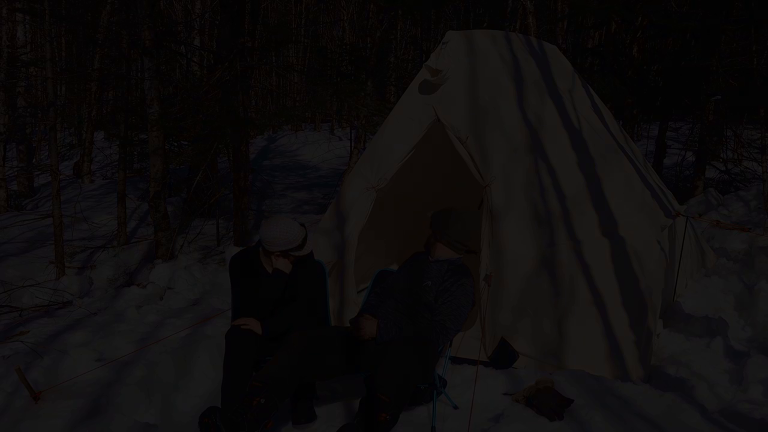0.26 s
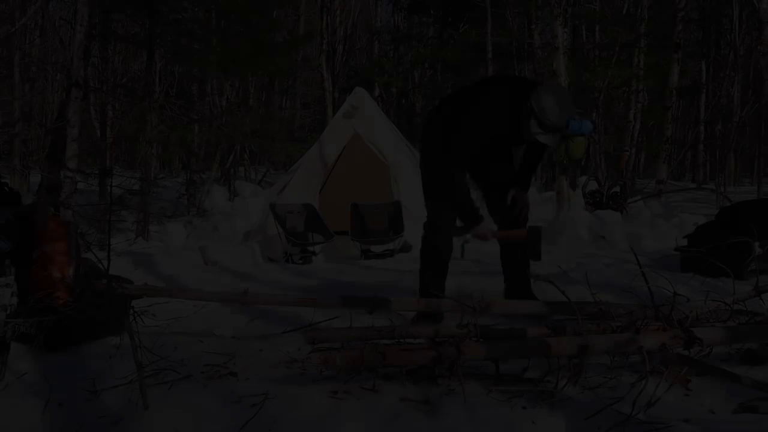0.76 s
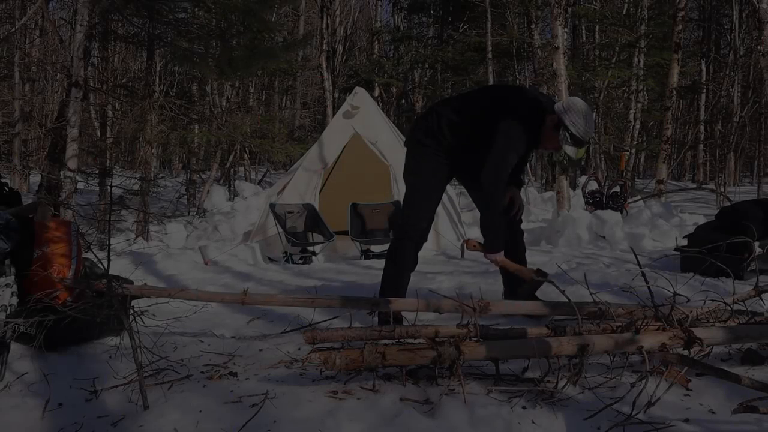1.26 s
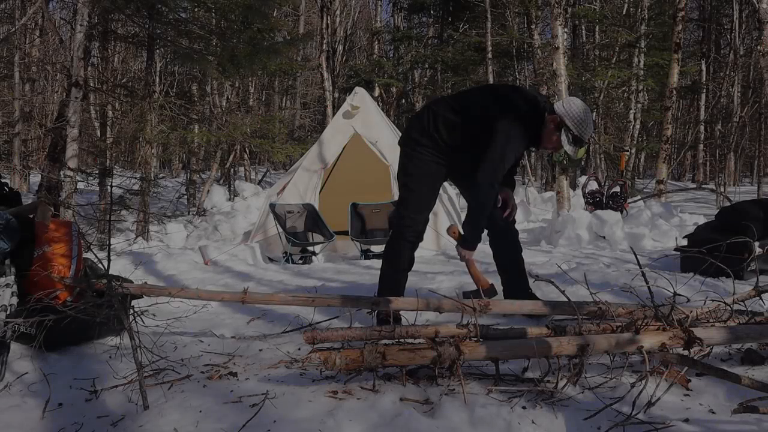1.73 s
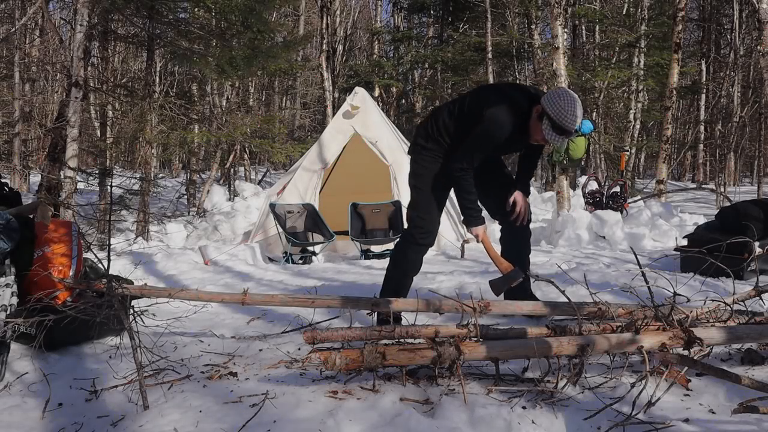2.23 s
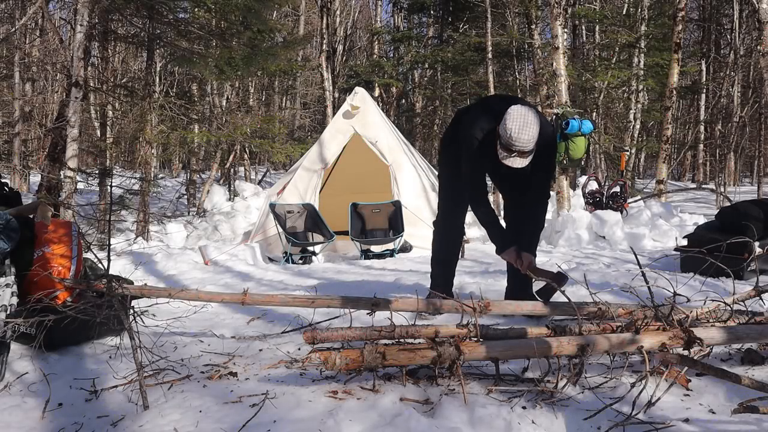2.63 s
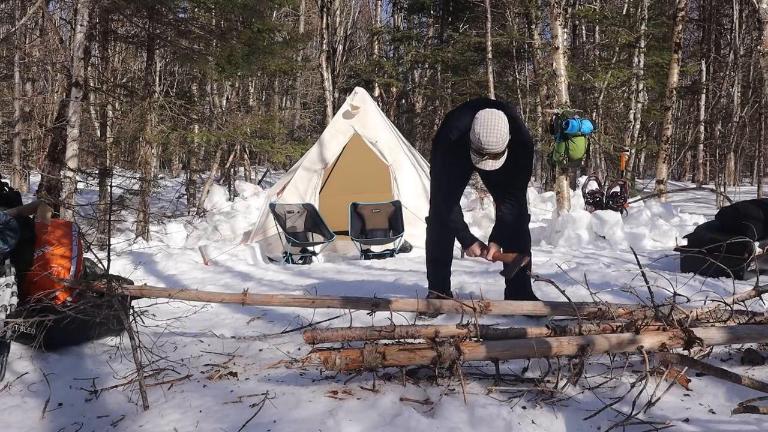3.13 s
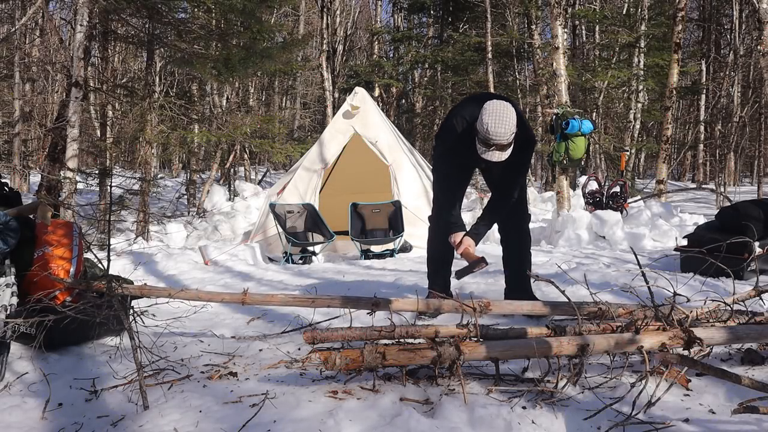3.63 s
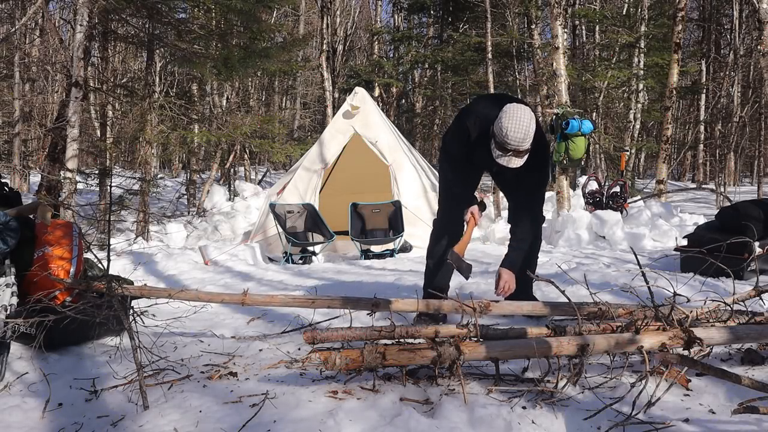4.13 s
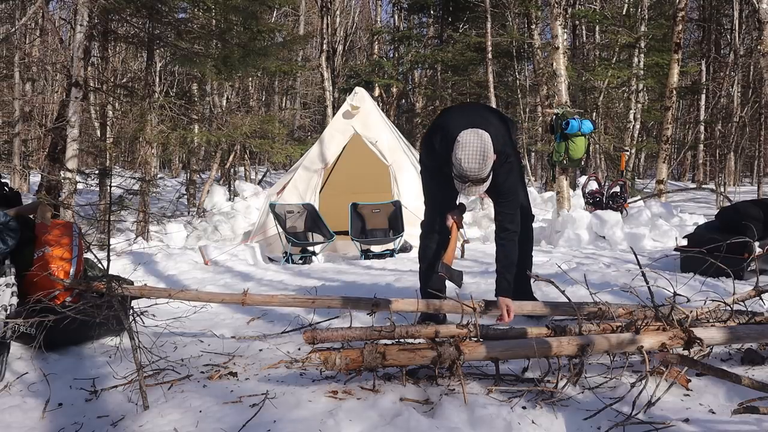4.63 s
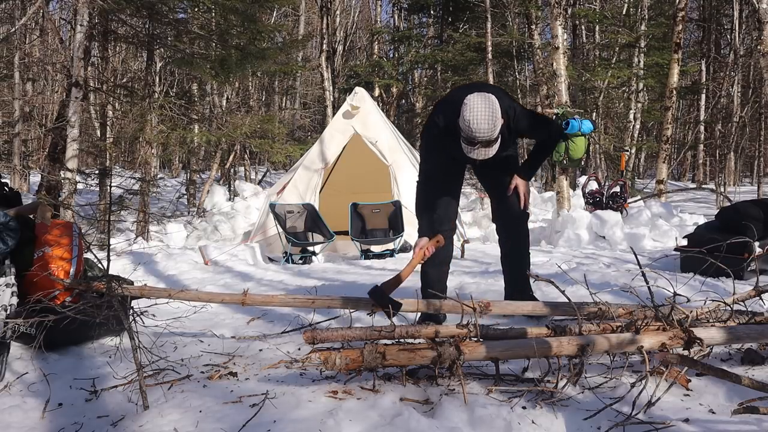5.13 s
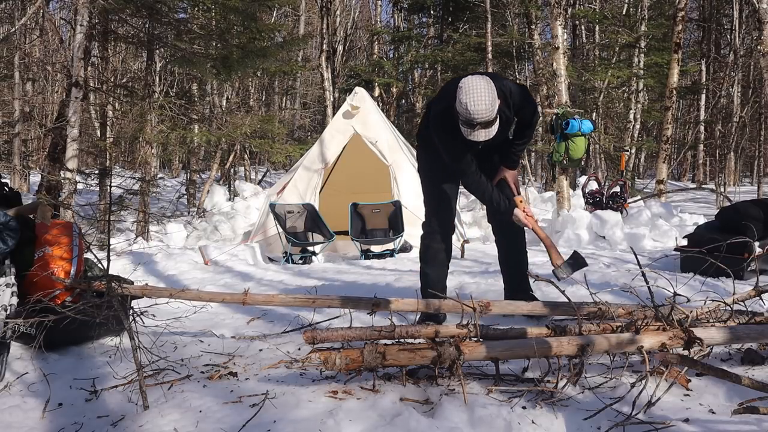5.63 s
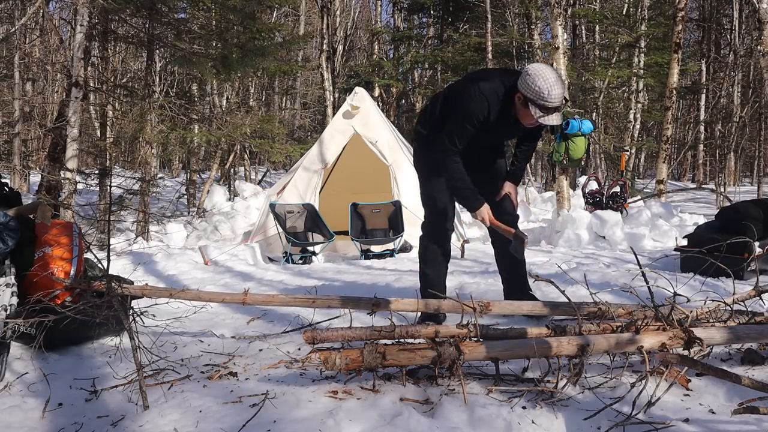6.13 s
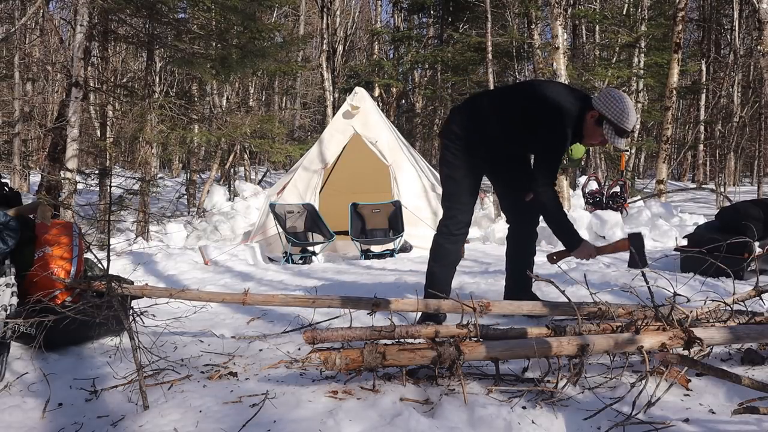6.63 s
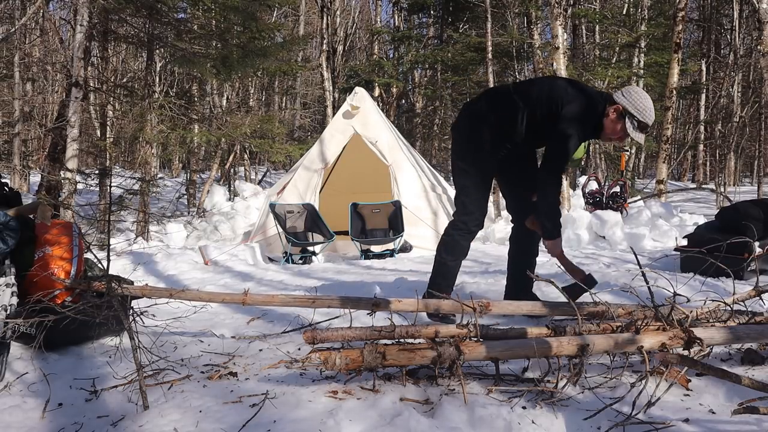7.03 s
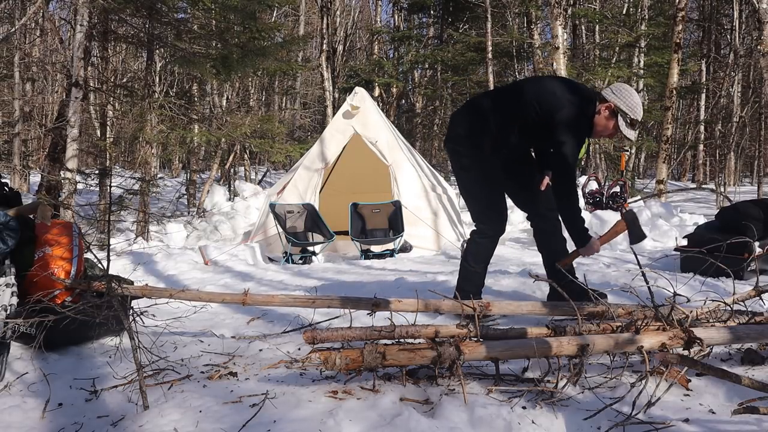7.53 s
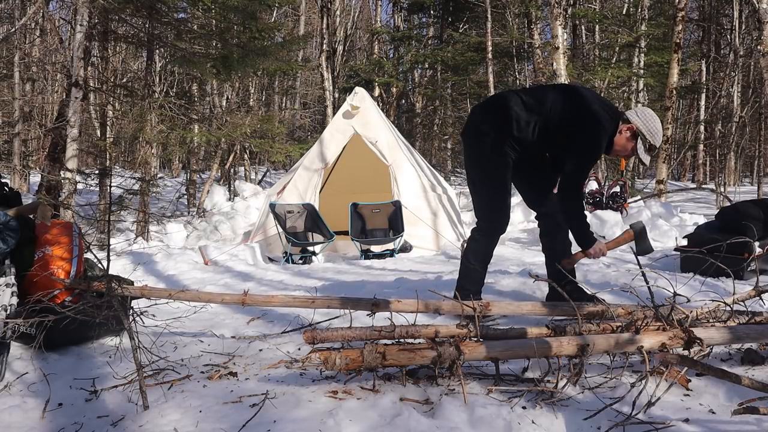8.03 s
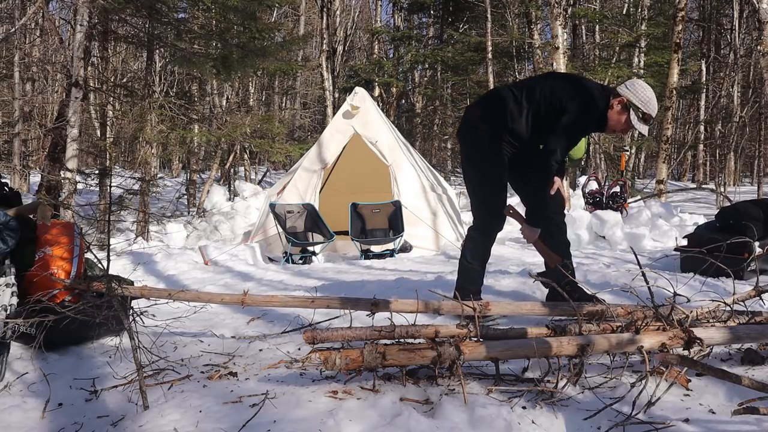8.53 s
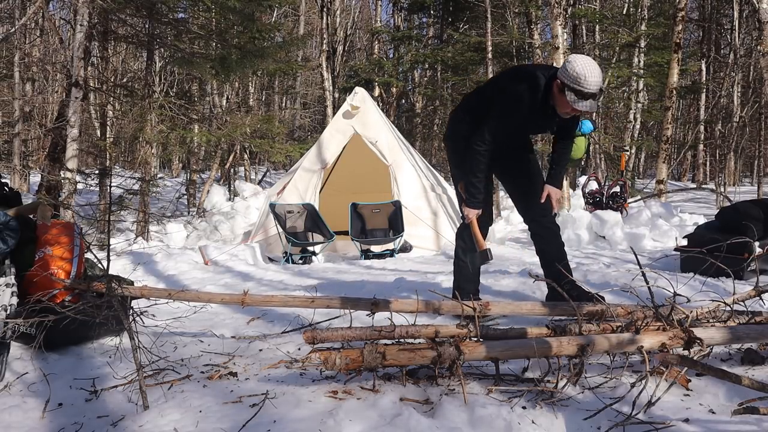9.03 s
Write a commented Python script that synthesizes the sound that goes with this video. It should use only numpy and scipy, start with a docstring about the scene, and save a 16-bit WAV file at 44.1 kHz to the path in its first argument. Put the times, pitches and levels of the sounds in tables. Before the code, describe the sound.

Outdoors in a still, snowy forest, wind briefly buffets the microphone while boots crunch and clothes swish. A hatchet a few metres away hits a dry pole twice, then once more with light bounces. Twigs snap, a duller chop follows, then three stronger blows come about a second apart or less. Each crack and hollow knock scatters back from the trees.

```python
"""A still winter wood: a hatchet chops the limbs off a dead pole lying on snow, a few metres from a microphone.
Each blow is a bright crack of filtered noise and a hollow knock of damped resonances.
The pole rings in decaying sines, splinters crackle as random grains, and trunks scatter the blows back.
Between blows boots crunch in snow and winter clothes swish, both from shaped noise or grains;
at first a light wind rumbles on the microphone."""
import sys
import numpy as np
from scipy import signal
from scipy.fft import rfft, irfft
from scipy.io import wavfile

SR = 44100
rng = np.random.default_rng(int(sys.argv[2]) if len(sys.argv) > 2 else 0)


def wav_out(sig):
    """Save sig, one row per channel (or a flat mono array), as 16-bit PCM at SR to the path in sys.argv[1]."""
    wavfile.write(sys.argv[1], SR, np.round(np.clip(np.atleast_2d(sig).T, -1, 1) * 32767).astype(np.int16))


N = 408366
T = np.arange(N) / SR
SHORT = T[:SR // 2]

# full chops into the pole: t/s, crack/dB, crack treble/dB, knock/dB, knock pitch/Hz, clack/dB,
# clack pitch/Hz, pole ring/dB, thump/dB (before the gain in thump()), splinters/dB
CHOP_EVENTS = [(1.1558, -8.5, 2.5, -12, 810, -32, 1320, -22.5, -24.5, -30.5),
               (1.64, -8.5, -3.5, -7, 946, -18.5, 2170, -23.5, -26.5, -27.5),
               (3.3743, -5, 3, -12, 630, -21, 2080, -14.5, -31.5, -28),
               (5.3886, -10, -5, -16.5, 470, -26.5, 1940, -42, -34.5, -28),
               (6.7582, -7, 3.5, -9, 806, -9.5, 1706, -26.5, -28, -32),
               (7.6718, -5.5, 2, -12.5, 466, -26, 3400, -16.5, -27.5, -26.5),
               (8.2487, -5.5, -7, -6.5, 803, -10.5, 1320, -18.5, -30.5, -27)]


def undb(db):
    """Decibels to gain."""
    return 10 ** (np.asarray(db) / 20)


def unit(x):
    """Scale to rms 1."""
    return x / np.sqrt(np.mean(x ** 2))


def burst(x):
    """Scale a hit so that its energy equals that of 4 ms at rms 1."""
    return x / np.sqrt(np.sum(x ** 2) / (0.004 * SR))


def add(track, start_s, x):
    """Mix x into the track from start_s."""
    i = int(start_s * SR)
    track[i:i + len(x)] += x[:N - i]


def lowpass(x, order, hz):
    """Zero-phase Butterworth low-pass."""
    return signal.sosfiltfilt(signal.butter(order, hz, fs=SR, output="sos"), x)


def colour(x, points):
    """Minimum-phase filter through (f/Hz, gain/dB) points, built from the cepstrum."""
    size = 8192
    hz, db = np.transpose(points)
    bins_hz = np.arange(size // 2 + 1) * SR / size
    gain_db = np.interp(np.log(bins_hz + 1), np.log(hz), db)
    cepstrum = irfft(np.log(undb(gain_db)))
    # fold onto positive times: causal
    cepstrum[1:size // 2] *= 2
    cepstrum[size // 2 + 1:] = 0
    impulse = irfft(np.exp(rfft(cepstrum)))
    return signal.fftconvolve(x, impulse)[:len(x)]


def resonate(x, modes):
    """Parallel resonances (f/Hz, width/Hz, level/dB) of alternating sign."""
    out = 0
    for k, (hz, width_hz, db) in enumerate(modes):
        b, a = signal.iirpeak(hz, hz / width_hz, SR)
        out = out + (-1) ** k * undb(db) * signal.lfilter(b, a, x)
    return out


def fade(t60_s):
    """Exponential decay over half a second; 1 - fade() is a build-up."""
    return np.exp(-np.log(1000) * SHORT / t60_s)


def swell(peak_s, rise_s, fall_s):
    """A rounded rise to 1 at peak_s and a fall from it."""
    span_s = np.where(T < peak_s, rise_s, fall_s)
    return np.exp(-2 * np.abs((T - peak_s) / span_s) ** 1.5)


def grains(size, per_s, spread_db):
    """Random tiny fractures of uneven strength and either sign, rms 1."""
    hits = rng.random(size) < per_s / SR
    strength_db = spread_db * np.clip(rng.standard_normal(size), -2, 2)
    return unit(hits * rng.choice([-1, 1], size) * undb(strength_db))


def walk(knots_per_s, times_s=T):
    """Random wander: straight lines between normal random knots."""
    knots = rng.standard_normal(len(times_s) // 20)
    return np.interp(times_s * knots_per_s, np.arange(len(knots)), knots)


def air(sway_db=1.0, wind_db=1, buffet_db=3, hiss_db=-65, lull_db_per_s=3):
    """Far hush of the wood, wind buffeting the microphone until it drops, and the microphone's faint hiss."""
    # distant air in the trees: t/s, level/dB
    hush_levels = [(.5, -53.5), (1.0, -51), (4, -47.5), (8, -50.5), (9.26, -46.5)]
    # spectrum of that air: f/Hz, density/dB per Hz
    forest = [(38, -48), (65, -6.5), (98, -13), (146, -10), (220, -6.5), (341, -6), (450, -6), (494, -4.5),
              (529, -4), (1460, -12), (3750, -25), (6670, -24.5), (9200, -27.5), (14600, -31.5),
              (16000, -28)]
    # wind on the microphone: t/s, level/dB (before wind_db)
    gusts = [(0.0, -55), (0.47, -55), (0.55, -27), (0.68, -43), (1.88, -41.5), (2.06, -47.5), (2.97, -39.5),
             (3.3, -48.5), (3.36, -44), (4.6, -69)]
    # spectrum of the wind rumble: f/Hz, density/dB per Hz
    wind = [(15, -5), (30, 1.5), (48, -0.5), (80, -8.5), (150, -25), (400, -83)]
    hush_db = np.interp(T, *np.transpose(hush_levels)) + sway_db * walk(3.43)
    hush = unit(colour(rng.standard_normal(N), forest)) * undb(hush_db)
    # after the last gust the wind dies away
    lull_db = lull_db_per_s * np.maximum(T - gusts[-1][0], 0)
    gust_db = wind_db + np.interp(T, *np.transpose(gusts)) - lull_db
    rumble = unit(colour(rng.standard_normal(N), wind)) * undb(gust_db + buffet_db * walk(12))
    return hush + rumble + undb(hiss_db) * rng.standard_normal(N)


def clothes(flutter_db=1, ease_s=0.051, arch_db=6):
    """Cloth slides over cloth: noise that eases in, peaks mid-movement and eases out."""
    # sleeves and trouser legs rubbing: start/s, end/s, level/dB, treble above 5 kHz/dB
    swishes = [(0.56, .92, -43, -2.5), (0.974, 1.37, -35, -6.5), (2.13, 2.508, -44.5, -3.5),
               (2.489, 2.555, -45, 12), (2.559, 2.672, -42.5, 7.5), (2.778, 2.898, -35, -0.5),
               (2.886, 2.967, -37, -12), (3.946, 4.044, -43.5, -2), (5.099, 5.32, -41.5, 2),
               (5.582, 5.98, -47.5, 3.5), (6.062, 6.248, -46.5, 2), (6.216, 6.605, -49, -4),
               (6.78, 7.054, -40.5, -1), (7.102, 7.476, -47, 0.5), (7.507, 7.652, -39, -3.5),
               (9.059, 9.503, -37.5, -0.5)]
    # spectrum of the rubbing weave: f/Hz, density/dB per Hz
    cloth = [(120, -39), (200, -10), (305, -2), (482, -6), (569, -5), (791, -4.5), (899, -4.5), (1710, -5),
             (2610, -8.5), (8270, -9), (9930, -17), (12800, -12), (16000, -22)]
    weave = unit(colour(rng.standard_normal(N), cloth))
    dull = lowpass(weave, 2, 5000)
    out = np.zeros(N)
    for start_s, end_s, db, treble_db in swishes:
        inside_s = np.maximum(np.minimum(T - start_s, end_s - T), 0)
        arch = undb(-arch_db * (1 - 2 * inside_s / (end_s - start_s)) ** 2)
        speed = np.tanh(2 * inside_s / ease_s) * arch
        out += speed * undb(db) * (dull + undb(treble_db) * (weave - dull))
    return out * undb(flutter_db * walk(26))


def boots(slip_db=2, land_s=0.0013, land_db=-5.5, settle_s=0.2, settle_db=-20, release_s=0.023,
          release_share=0.25):
    """Steps land, load and settle: dull crunch of snow crystals and finer hiss of crust, in uneven slips."""
    # boots pressing into snow: sole lands/s, time to full weight/s, level/dB, crust hiss re crunch/dB
    steps = [(.576, 0.0072, -28.5, -11), (.598, 0.015, -31, -5), (.63, 0.22, -43, -30),
             (.905, 0.0092, -39.5, -7.5), (0.996, 0.005, -33, -10), (1.021, 0.062, -35.5, -2.5),
             (2.355, 0.015, -40, -24), (2.41, 0.043, -43.5, -2), (2.596, .058, -34.5, -4.5),
             (2.789, 0.0078, -34, 1), (4.158, 0.013, -37, 0), (4.196, 0.0084, -30, -8),
             (6.271, 0.085, -34, -14.5), (6.404, 0.0044, -36.5, -29), (6.575, .01, -40, -24),
             (7.029, 0.019, -41, 0.5), (7.22, 0.011, -27.5, -5.5), (7.336, 0.0055, -27.5, -12),
             (7.601, 0.016, -24, -12)]
    # spectrum of crushed snow crystals: f/Hz, gain/dB
    snow = [(50, -5.5), (130, -5), (500, 3.5), (1100, 0), (2200, 1), (3300, -7), (4400, -18), (8000, -26),
            (16000, -40)]
    crust_points = [(800, -12), (3500, 3), (8300, 0.5), (10000, -9), (13000, -1.5), (16000, -23.0)]
    weight, crust = np.zeros(N), np.zeros(N)
    for start_s, load_s, db, treble_db in steps:
        peak_s = start_s + load_s
        landed = np.clip((T - start_s) / land_s, 0, 1)
        # the sole breaks the crust at once; the packed snow creaks on afterwards
        settling = undb(settle_db) * swell(peak_s, load_s, settle_s)
        bed = np.where(T < peak_s, undb(land_db), settling)
        loading = swell(peak_s, load_s + land_s, release_s + release_share * load_s)
        press = undb(db) * landed * np.maximum(bed, loading)
        weight += press
        crust += press * undb(treble_db)
    crunch = unit(colour(grains(N, per_s=3800, spread_db=2.5), snow))
    hiss = unit(colour(grains(N, per_s=8900, spread_db=7.5), crust_points))
    return (weight * crunch + crust * hiss) * undb(slip_db * walk(130))


def trunks(x, low_db=-14, high_db=-14, t60_s=0.82, treble_t60_s=0.59, build_t60_s=0.041):
    """Many small echoes from the surrounding trees; snow soaks up the highest treble."""
    # colour of the echoes: f/Hz, gain/dB
    echo = [(60, -2.5), (160, -3.5), (300, -18), (700, -3.5), (1300, 6.5), (2200, 1.5), (3200, 0.5),
            (5500, -4.5), (8200, -10), (10000, -12.5), (13000, -12), (16000, -29)]
    arrivals = grains(len(SHORT), per_s=2500, spread_db=5.0) * (1 - fade(build_t60_s)) ** 2
    low = lowpass(x, 3, 1000)
    echoes = arrivals * fade(t60_s)
    body = signal.fftconvolve(low, echoes / np.linalg.norm(echoes))[:N]
    # rough bark scrambles short waves: their energy returns without the crack's resonances
    returns = (arrivals * fade(treble_t60_s)) ** 2
    energy = signal.fftconvolve((x - low) ** 2, returns / returns.sum())[:N]
    scatter = np.sqrt(np.abs(energy)) * rng.standard_normal(N)
    return colour(undb(low_db) * body + undb(high_db) * scatter, echo)


def twig(snap_t60_s=0.0051, tear=0.29, tear_t60_s=0.064):
    """One sharp snap, then the last fibres tear: noise with a fast and a slow decay."""
    # spectrum of a snapping twig: f/Hz, gain/dB
    snap = [(300, -13), (1000, -2), (1800, 5), (5000, 4.5), (7400, 13), (9500, -1.5), (12000, 6),
            (16000, -1)]
    envelope = fade(snap_t60_s) + tear * fade(tear_t60_s)
    return burst(colour(rng.standard_normal(len(SHORT)) * envelope, snap))


def debris(twig_db=-9, count=2, chip_db=-41, chip_spread_db=4):
    """Twigs snap, and a few chips tick down after every chop."""
    # dry twigs snapping: t/s, level/dB (before twig_db)
    snaps = [(1.868, -34), (2.7905, -31), (3.591, -26.5), (3.6402, -31), (3.6796, -26.5), (4.206, -20),
             (4.5327, -14), (4.544, -25), (4.57, -23), (5.451, -19), (5.459, -27), (5.506, -22),
             (7.1707, -28.5), (7.905, -27.5), (8.3885, -26.5), (8.52, -40)]
    out = np.zeros(N)
    for start_s, db in snaps:
        add(out, start_s, undb(db + twig_db) * twig())
    for start_s, crack_db, *_ in CHOP_EVENTS:
        for flight_s in rng.uniform(0.15, 0.36, count):
            db = crack_db + chip_db + chip_spread_db * rng.uniform(-1, 1)
            add(out, start_s + flight_s, undb(db) * twig())
    return out


def splinters(t60_s=0.4):
    """Bark and small branches shake and crackle after the blow."""
    # spectrum of shaken bark: f/Hz, gain/dB
    bark = [(150, 1.5), (600, 10.5), (1500, 3), (3200, 6.5), (5500, -2.5), (8200, 5), (10000, -7.5),
            (13000, -4), (16000, -18.5)]
    crackle = grains(len(SHORT), per_s=1400, spread_db=5.5)
    return unit(colour(crackle, bark)) * fade(t60_s) * (1 - fade(0.0053))


def thump(shake_t60_s=0.17, gain_db=7):
    """The pole is driven into the pile beneath it, so the low end comes late and lingers."""
    # the whole pile shuddering on the snow: f/Hz, width/Hz, level/dB
    pile = [(69, 20, -8.5), (113.7, 7.1, -1), (170.3, 8.5, 5), (239, 116, -3), (335, 210, -7)]
    shake = rng.standard_normal(len(SHORT)) * fade(shake_t60_s)
    rounding = signal.butter(2, 500, fs=SR, output="sos")
    return undb(gain_db) * burst(signal.sosfilt(rounding, resonate(shake, pile)))


def pole(place_db=1.5, detune=0.0073, build_t60_s=0.11, rub_db=0.5):
    """Bending waves build up; impact place favours modes, snow and branches damp them unevenly."""
    # bending modes of the pole: f/Hz, level/dB, t60/s
    bending = [(356, -20.5, 0.092), (476, -0.5, 0.17), (581.3, 4.5, 0.18), (740, -9, 0.19),
               (943, -0.5, 0.089), (1057, -28, 0.092)]
    chance = rng.standard_normal((len(bending), 3))
    ring = 0
    for (hz, db, t60_s), (place, shift, phase_cycles) in zip(bending, chance):
        level_db = db + place_db * place + rub_db * walk(110, SHORT)
        cycles = hz * (1 + detune * shift) * SHORT + phase_cycles
        ring = ring + undb(level_db) * fade(t60_s) * np.sin(2 * np.pi * cycles)
    return ring * (1 - fade(build_t60_s))


def clack(hz, t60_s=0.016):
    """The split wood beside the blade clacks: a short decaying sine at the given pitch."""
    return burst(np.sin(2 * np.pi * hz * SHORT) * fade(t60_s) * (1 - fade(0.0096)))


def knock(hz, push_t60_s=0.0024, judder=2.5, judder_t60_s=0.052):
    """The head stops in the wood: one short push and a noisy judder excite damped resonances."""
    # damped resonances around the cut: multiple of knock pitch, width/Hz, level/dB
    hollow = [(.52, 140, -4), (0.798, 130, 4.5), (1.1, 167, 6), (1.58, 258, -2.5)]
    shudder = burst(rng.standard_normal(len(SHORT)) * fade(judder_t60_s))
    push = burst(fade(push_t60_s)) + judder * shudder
    return burst(resonate(push, [(ratio * hz, width_hz, db) for ratio, width_hz, db in hollow]))


def crack(t60_s, treble_db, grit=0.28, strike=0.18, tick=0.16, tick_t60_s=0.0023):
    """The edge lands and rings the blade, then fibres part; harder wood gives more treble."""
    # blade biting into hard dry wood: f/Hz, width/Hz, level/dB
    blade = [(1714, 410, -21.5), (3056, 190, 5.5), (3720, 880, -2), (4615, 350, 0.5), (5000, 400, -5),
             (6900, 300, 2.5), (7970, 410, -3.5), (8790, 120, 1), (11760, 680, -13.5), (13160, 650, -3.5),
             (14000, 200, -12.5)]
    rupture = burst(rng.standard_normal(len(SHORT)) * fade(t60_s) * (1 - fade(0.003)))
    contact = burst(rng.standard_normal(len(SHORT)) * fade(tick_t60_s) * (1 - fade(0.0024)))
    edge = burst(signal.unit_impulse(len(SHORT), int(0.00055 * SR)))
    bite = resonate(rupture + strike * edge, blade) + grit * (rupture + tick * contact)
    return burst(colour(bite, [(4800, 0.0014), (7000, treble_db)]))


def rebounds(treble_db=-2.5, thump_db=-24, splinter_db=-28.5, clack_db=-9.5, clack_ratio=1.506, ring_db=-22):
    """Light contacts: a weaker crack and a knock that stirs the pole only a little."""
    # head glancing off or pole bouncing on the pile: t/s, crack/dB, crack t60/s, knock/dB, knock pitch/Hz
    contacts = [(1.6814, -13.5, 0.024, -24.5, 456), (2.9762, -21.5, .036, -16.5, 575),
                (3.0021, -14, 0.034, -36, 540), (3.054, -32, 0.065, -21.5, 382),
                (3.3836, -17, 0.034, -10.5, 890), (3.3968, -26, 0.033, -13, 660),
                (3.4050, -41, .023, -13, 810), (5.4125, -26.5, .1, -30.5, 380),
                (7.6841, -15, 0.017, -20, 710), (8.323, -42, .04, -28, 380)]
    out = np.zeros(N)
    for start_s, crack_db, crack_t60_s, knock_db, knock_hz in contacts:
        # thump and splinters re crack; clack and ring re knock
        edge = crack(crack_t60_s, treble_db)
        edge = edge + undb(thump_db) * thump() + undb(splinter_db) * splinters()
        body = knock(knock_hz) + undb(clack_db) * clack(clack_ratio * knock_hz)
        body = body + undb(ring_db) * pole()
        add(out, start_s, undb(crack_db) * edge + undb(knock_db) * body)
    return out


def hatchet(crack_t60_s=0.022):
    """Full chops: crack, clack and knock; the pole rings, thumps the pile and sheds splinters."""
    out = np.zeros(N)
    for (start_s, crack_db, treble_db, knock_db, knock_hz, clack_db, clack_hz,
         ring_db, thump_db, splinter_db) in CHOP_EVENTS:
        add(out, start_s, undb(crack_db) * crack(crack_t60_s, treble_db))
        add(out, start_s, undb(clack_db) * clack(clack_hz))
        add(out, start_s, undb(knock_db) * knock(knock_hz))
        add(out, start_s, undb(ring_db) * pole())
        add(out, start_s, undb(thump_db) * thump())
        add(out, start_s, undb(splinter_db) * splinters())
    return out


def scene():
    """The air, the woodcutter's movements, the chopping and its echoes."""
    wood = debris() + rebounds() + hatchet()
    return (air() + clothes() + boots() + trunks(wood) + wood)[None]


def record(dry, top_hz=16000):
    """Peaks beyond full scale are flattened; a steep low-pass cuts the top."""
    limited = np.clip(dry, -1, 1)
    return signal.sosfilt(signal.ellip(8, 0.2, 70, top_hz, fs=SR, output="sos"), limited)


dry = scene()
out = record(dry)
wav_out(out)
```